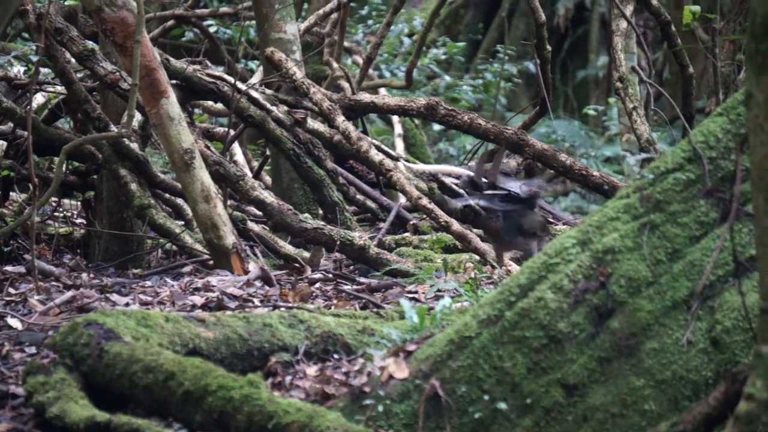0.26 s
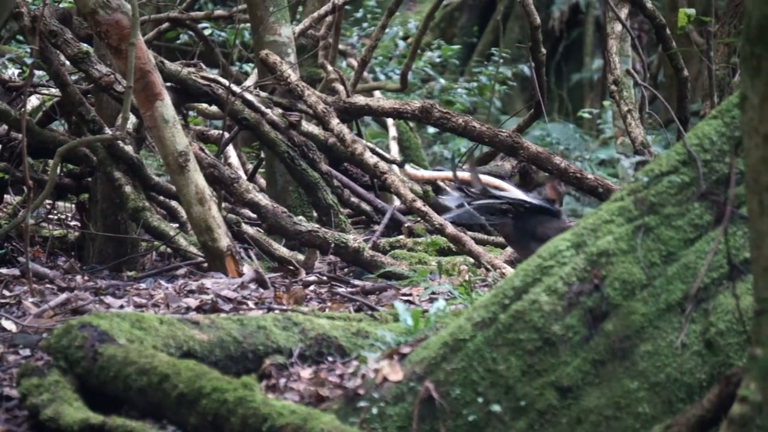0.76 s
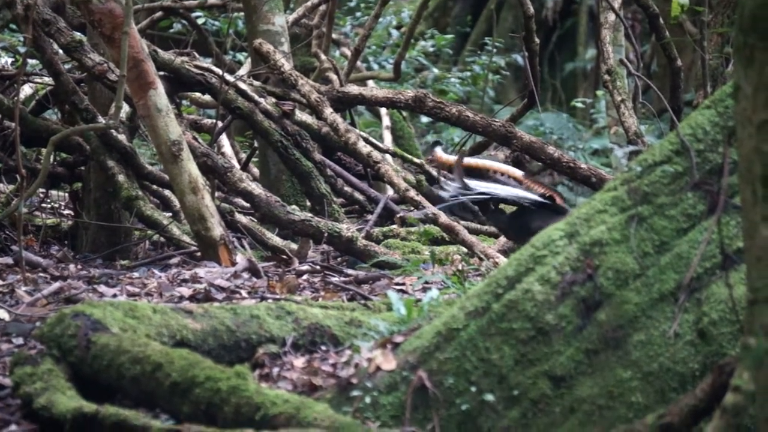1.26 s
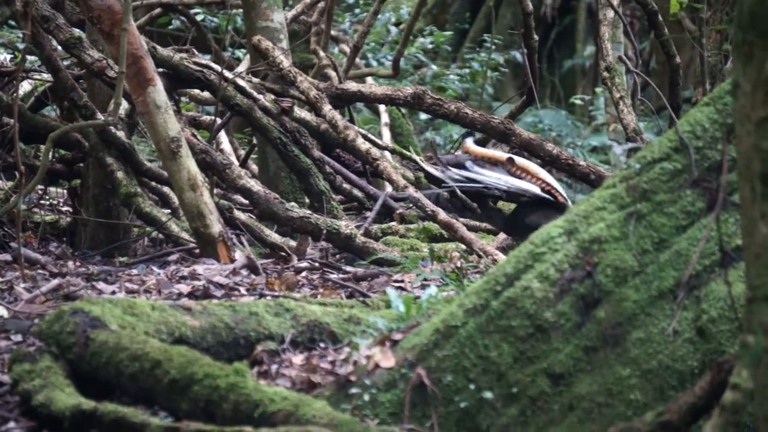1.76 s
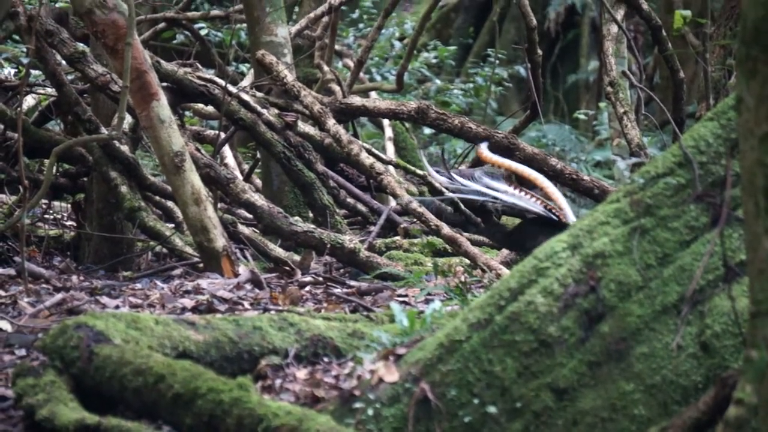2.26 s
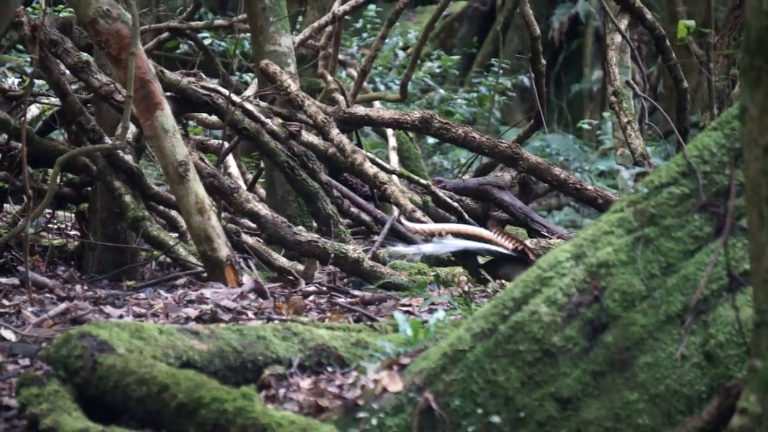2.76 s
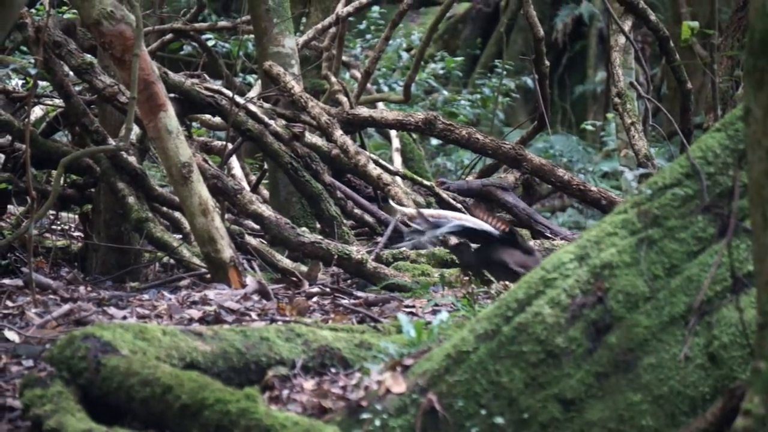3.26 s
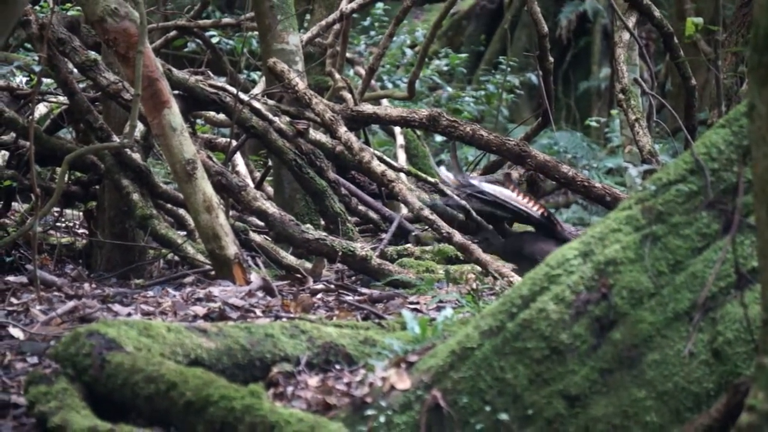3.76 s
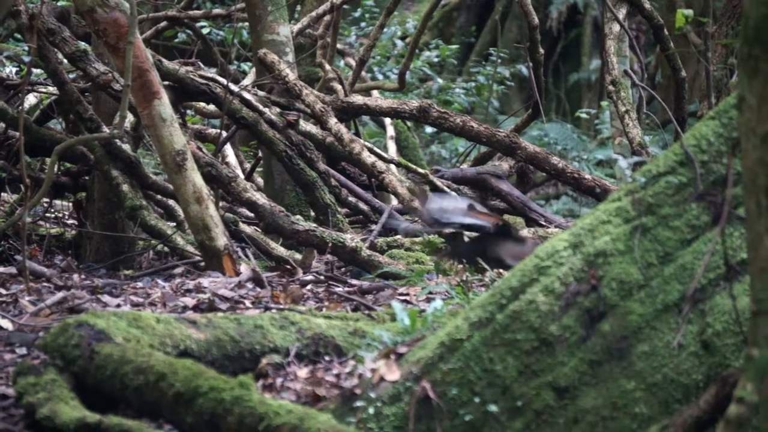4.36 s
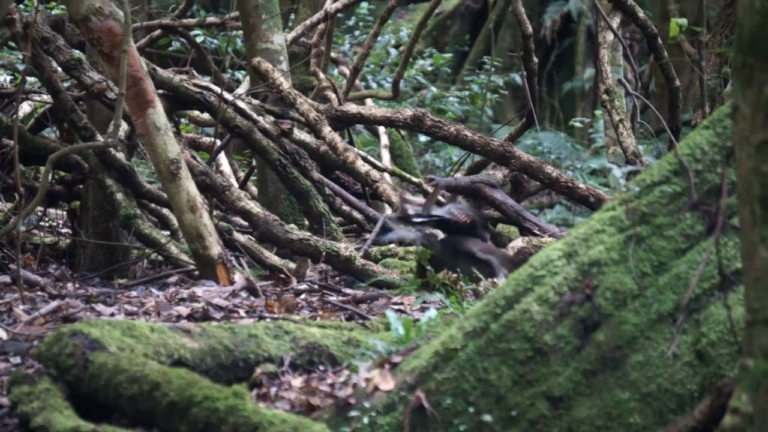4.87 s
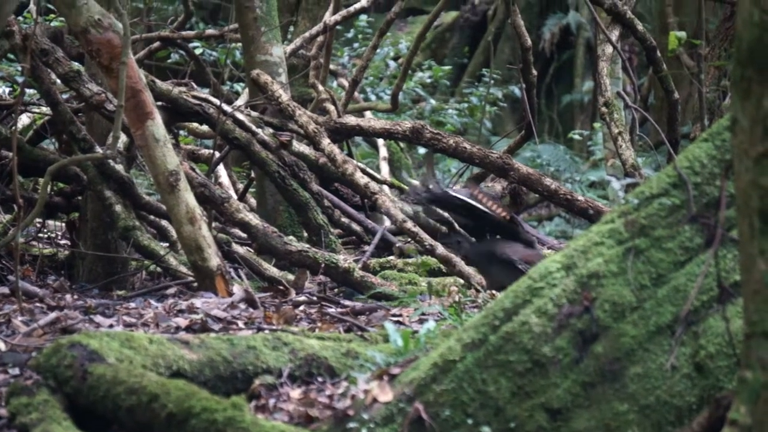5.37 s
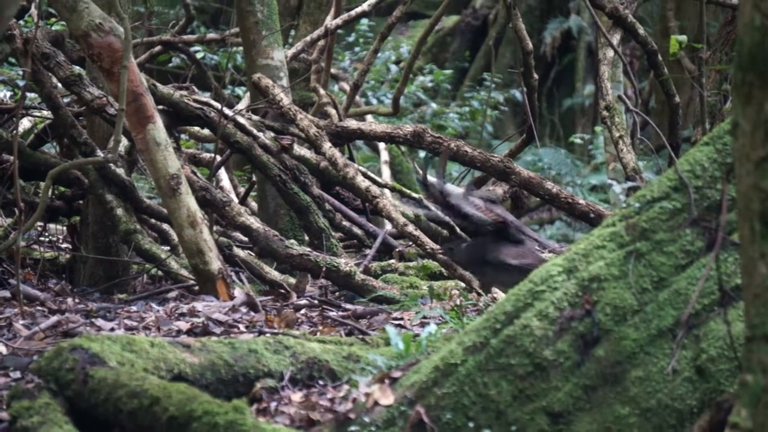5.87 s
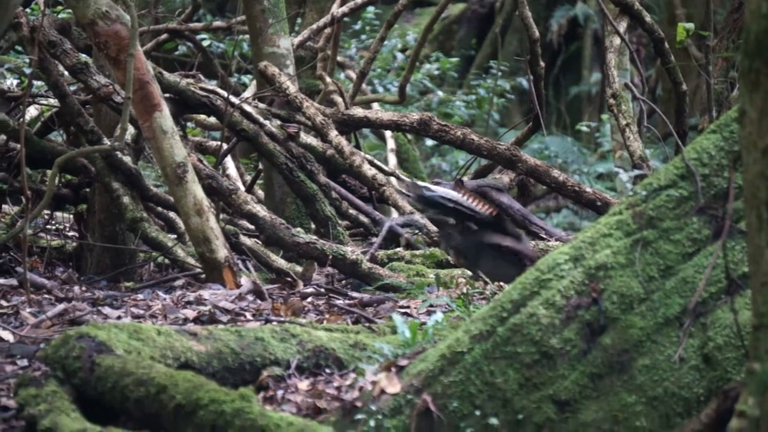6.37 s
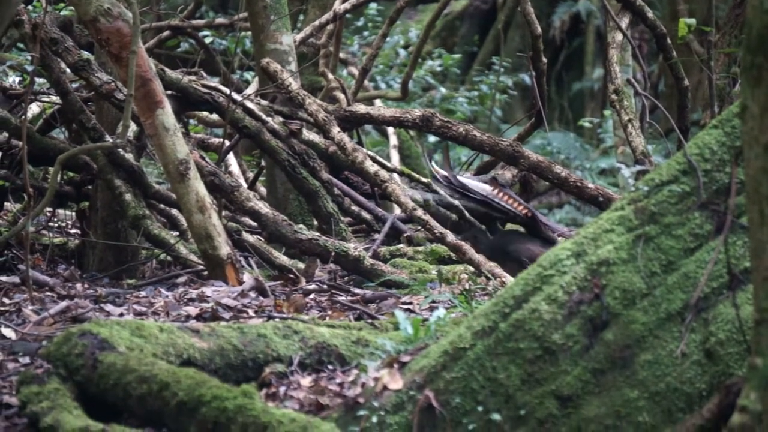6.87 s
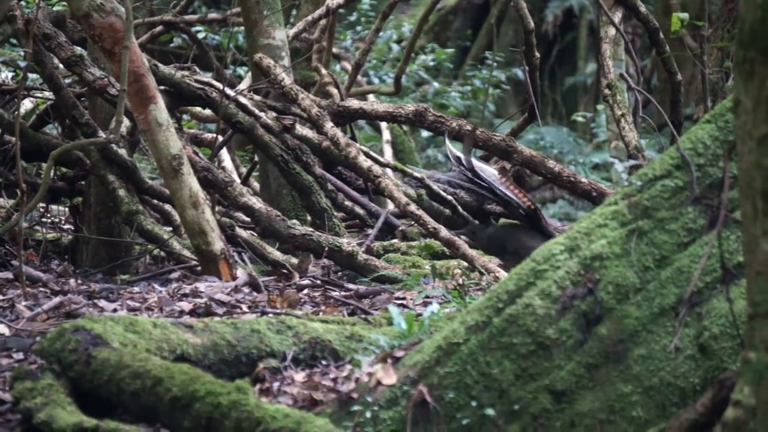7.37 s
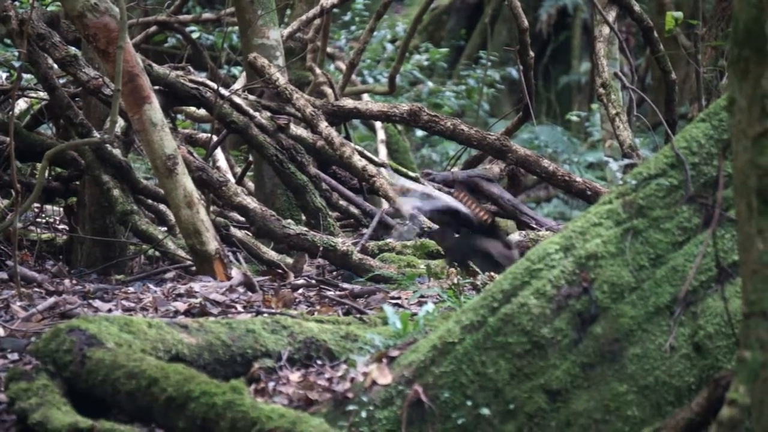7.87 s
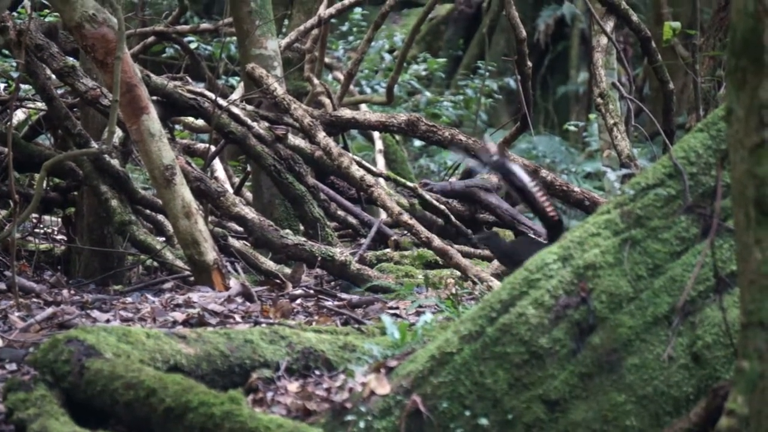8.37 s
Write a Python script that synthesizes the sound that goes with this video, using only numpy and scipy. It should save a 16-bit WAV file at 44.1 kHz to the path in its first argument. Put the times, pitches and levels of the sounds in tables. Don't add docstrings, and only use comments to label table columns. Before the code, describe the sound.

Outdoors in a wood, soft canopy wind and a faint low rumble lie under thin, high, distant bird chirps. From 0 to 1.8 seconds a large bird close by shakes its feathers in a dense, papery, hissing rattle, punctuated by crisp bill snaps at about 0.13, 0.37, 0.6, 1.0 and 1.4, with small liquid gurgles between. At 2.05 a soft low whistle tips into a very loud, sharp, throbbing note, a tenth of a second of fast fluttering pulses near two kilohertz, with a diffuse echo off the trunks. Similar notes follow at about 3.7, 5.35 and 7.0. In the gaps come faint bill ticks and slow feather shivers, with a dull cluck and gurgle at 3.3, 5.0 and 6.65. After the last echo, light ticks, a low gurgle near 8.3 and distant chirps remain until 8.6.

```python
import sys
import numpy as np
from scipy import signal
from scipy.fft import rfft, irfft, next_fast_len
from scipy.io import wavfile
from scipy.ndimage import uniform_filter1d, minimum_filter1d

SR = 44100
rng = np.random.default_rng(int(sys.argv[2]) if len(sys.argv) > 2 else 0)


def store_pcm(level_fs):
    pcm = np.round(np.clip(level_fs, -1, 1) * 32767).astype(np.int16)
    wavfile.write(sys.argv[1], SR, np.atleast_2d(pcm).T)


def magnitude_from_level(level_db):
    exponent = np.asarray(level_db, float) / 20
    return 10 ** exponent


N = 379701
PADDED = next_fast_len(N)
FREQS = np.maximum(np.fft.rfftfreq(PADDED, 1 / SR), 1)
SIDES = np.array([[1], [-1]])

# f/Hz, density/dB per Hz
CANOPY = [(18, -70), (30, -10), (241, -7.5), (531, -14.5), (752, -10.5), (1090, -4), (1270, -5.5),
          (1400, -6), (2180, -8.5), (2530, -13.5), (4160, -20.5), (7530, -25.5), (11200, -32), (14600, -77),
          (22000, -120)]
# f/Hz, side minus mid/dB
SIDE_SHARE = [(60, -20), (170, -22), (490, -9), (1410, -7.5), (4030, -6), (11500, -10.5)]
# t/s, level/dB
HUSH = [(0, -61), (.9, -56.5), (1.87, -57.5), (2.3, -66), (3.5, -57), (3.95, -64.5), (4.3, -56.5),
        (4.84, -61.5), (5.5, -60), (6.02, -51), (6.45, -56.5), (7, -62), (8.61, -63)]
# t/s, level/dB
RUMBLE = [(0, -58), (.89, -54), (1.87, -64.5), (2.5, -68), (3.2, -65.5), (6, -65), (7.5, -62.5),
          (8.61, -60)]
# t/s, level/dB
RATTLE_BASE = [
    (0, -72),
    (.14, -45),
    (.8, -42),
    (1.5, -44.5),
    (1.9, -49),
    (3.6, -62),
    (8.61, -89),
]
# f/Hz, width/Hz, level/dB
QUILLS = [(1335, 120, 4), (1890, 740, 3.5), (3050, 620, -2.5), (4410, 1370, 0), (5830, 120, -3.5),
          (6900, 810, -4), (8820, 900, -13.5), (10470, 610, -23)]
# t/s, level/dB, brightness/dB
SHAKES = [
    (.27, -54, -20),
    (.5, -49, -19),
    (.75, -44.5, 0),
    (.88, -45.5, -28),
    (1.136, -46, 5),
    (1.51, -47.5, 6.5),
    (1.7, -56, -6),
]
# t/s, level/dB, brightness/dB
SHIVERS = [(2.72, -53, 5.5), (3.16, -49, 2), (3.3, -51, 2), (4.38, -59.5, 14), (4.83, -53, 0),
           (4.93, -51, 2.5), (6.04, -55, 7), (6.5, -53.5, 6.5), (6.62, -56.5, 11), (7.65, -59, 10.5),
           (8.1, -62.5, 13.5), (8.25, -62, 9)]
# t/s, level/dB
CHIRPS = [(.045, -52), (0.532, -54), (1.719, -60), (1.95, -55), (2.4, -57), (2.65, -57), (2.932, -59),
          (3.201, -53), (3.43, -60), (3.648, -53), (3.974, -61), (4.158, -57.5), (4.38, -55),
          (4.632, -58.5), (4.867, -56), (5.707, -59), (6.19, -60), (6.39, -55), (6.656, -55.5),
          (6.842, -57.5), (7.565, -57), (7.838, -57.5), (8.359, -58)]
# t/s, length/s, f/Hz, level/dB, roughness/0-1
WHISTLES = [(.264, 0.16, 6860, -49, 0.4), (1.734, 0.14, 576, -52.5, 0.01), (1.747, 0.13, 780, -52.5, 0.06),
            (2.989, .11, 5440, -55, 0.8), (3.186, 0.12, 3900, -53, 0.07), (3.33, 0.14, 3890, -51, 0.11),
            (3.5, .12, 3870, -62, .2), (4.182, 0.035, 6900, -55, 0.3), (4.32, 0.098, 3760, -56, 0.25),
            (4.982, 0.036, 8000, -54, 0.5), (5.067, 0.28, 7540, -64.5, 0.1),
            (8.11, 0.17, 6650, -60.5, 1.17), (8.406, 0.14, 5850, -51, 0.8)]
# f/Hz, early t60/s, late t60/s, strength/dB
FOREST = [(600, 0.39, 4.3, 5.5), (1110, 0.19, 1.6, 9), (1885, 0.58, 0.66, 4.5), (2330, 0.49, 3.18, 5.5),
          (2620, 0.74, 1.37, 6), (3770, 0.72, 1.18, 3.5), (8000, 0.51, 1.23, 9), (10900, 0.46, 0.66, 11)]
# multiple/1, level in notes/dB, level in soft sounds/dB
OVERTONES = [(1, 0, 0), (2, -22.5, -28), (3, -45, -28), (4, -38, -44), (5, -40, -50), (7, -70, -39)]
# f/Hz, density/dB per Hz
RASP = [(1590, -64), (2700, -4.5), (3000, -9), (3600, 0), (4250, -3.5), (5530, -17), (6080, -28),
        (6600, -9.5), (7510, -20.5), (8440, -11), (9390, -21.5), (10300, -14.5), (11000, -18), (14300, -54),
        (22000, -120)]
# t of top/s, peak/dB, f/Hz, half width/ms
GURGLES = [
    (.091, -38, 2070, 10),
    (.271, -36.5, 1850, 6.3),
    (.513, -43, 1860, 6.4),
    (1.118, -51, 2200, 12),
    (1.497, -44, 2050, 15),
    (1.74, -56, 1960, 4),
    (8.27, -42, 1390, 8),
    (3.32, -32.5, 2100, 2.57),
    (4.9835, -28.5, 1900, 2.35),
    (6.66, -29.5, 1880, 2.59),
]
# f/Hz, level/dB, t60/s, ring/0 low 1 middle 2 high
BILL = [(1860, 6, 0.024, 0), (2200, 6, 0.0046, 0), (3010, -4.5, 0.0055, 1), (4270, -8.5, 0.016, 1),
        (4430, -7, 0.011, 1), (6580, 2.5, 0.0085, 2), (8500, -34, 0.0033, 2), (9900, -12, 0.0057, 2)]
# t/s, peak/dB
SNAPS = [
    (.1345, -26.5),
    (.3739, -28.5),
    (0.6112, -25.5),
    (1.0029, -26.5),
    (1.373, -27),
]
# low, middle, high ring/dB
SNAP_RINGS = (-1.5, 3.5, -32)
# t/s, peak/dB
CLUCKS = [
    (3.3172, -40),
    (4.9808, -37),
    (6.6582, -41),
]
# t/s, peak/dB, brightness/dB
TICKS = [(2.709, -47.5, 11), (3.152, -43, 6.5), (4.373, -50, 13.5), (4.48, -44.5, -3), (4.817, -43.5, 2),
         (4.9325, -47, 3), (4.963, -53, 3), (6.0326, -45, 4), (6.137, -43, -10), (6.4911, -44.5, 6),
         (6.6047, -46, 3), (7.644, -42.5, -5), (7.7504, -50, .3), (8.09, -38.5, 0.5), (8.1997, -55, 15)]
# t of top/s, peak/dB, f/Hz, half width/ms
LEADS = [
    (2.0325, -23, 1251, 13.3),
    (2.051, -24, 1256, 13),
    (3.6785, -23.5, 1185, 15.6),
    (3.6955, -28.5, 1210, 8.8),
    (5.333, -23, 1237, 18),
    (6.9755, -23, 1194, 16.7),
    (6.9923, -26.5, 1195, 10.4),
]
# t of top/s, peak/dB, f/Hz, half width/ms
LINGER = [
    (2.085, -34.5, 1235, 20),
    (3.728, -30, 1171, 24),
    (5.357, -29.5, 1261, 13),
    (7.023, -49, 1140, 14),
]
# t of first throb/s, peak/dB, f/Hz, throb gap/ms, growth per throb/dB
BURSTS = [(2.0608, -6, 1948, 4.6, -1), (2.0950, -4.5, 2067, 5.0, -2.3), (2.1190, -6.5, 2010, 5.5, -1),
          (2.1458, -10, 2096, 4.6, -0.3), (3.7078, -10, 2148, 5.5, 2), (3.7395, -8.5, 2058, 6.0, 0),
          (3.7667, -11, 2093, 5.5, 0.7), (3.7913, -10, 2030, 6.6, 1.1), (5.3592, -7, 2053, 5.4, -.6),
          (5.3884, -8.5, 2001, 5.7, .1), (5.4174, -9, 2002, 5.5, 0.1), (5.441, -10.5, 1974, 6.4, -2.5),
          (7.0042, -4, 2028, 5.4, -2.5), (7.0354, -4.5, 2042, 6.5, -1.3), (7.0646, -9.5, 1970, 6.2, -0.6),
          (7.0894, -15, 1973, 5.2, 1.5), (7.105, -15, 2067, 9.4, -3)]
# level/dB, half width/ms
BURST_SHAPE = [
    (0.5, 3.3),
    (-.6, 3.0),
    (-0.8, 3.2),
    (-6.5, 2.166),
]


def rms_one(x):
    return x / np.sqrt(np.mean(x ** 2) + 1e-20)


def in_time(rows):
    s, *columns = np.transpose(rows)
    return [np.interp(np.arange(N) / SR, s, c) for c in columns]


def at_hz(points, hz, index=1):
    points = np.array(points)
    return np.interp(np.log(hz), np.log(points[:, 0]), points[:, index])


def add(track, start_s, piece):
    i = round(start_s * SR)
    track[i:i + len(piece)] += piece[:N - i]


def coloured(x, gain):
    return irfft(rfft(x, PADDED) * gain, PADDED)[..., :N]


def spread(mid, side):
    side = coloured(side, magnitude_from_level(at_hz(SIDE_SHARE, FREQS)))
    return np.array([mid + side, mid - side])


def wind():
    noise = coloured(spread(*rng.standard_normal((2, N))), magnitude_from_level(at_hz(CANOPY, FREQS)))
    rumble = coloured(noise, 1 / (1 + (FREQS / 320) ** 6))
    leaves = coloured(noise, 1 / (1 + (800 / FREQS) ** 6))
    hush = noise - rumble - leaves
    hum = coloured(spread(*rng.standard_normal((2, N))), 1 / (1 + ((FREQS - 115) / 25) ** 2))
    (rumble_db,), (hush_db,) = in_time(RUMBLE), in_time(HUSH)
    hum_db = -70 + 5 * np.interp(np.arange(N), np.linspace(0, N, num=30), rng.standard_normal(30))
    leaves_db = -50.5 + 0.089 * (rumble_db - rumble_db.mean())
    rumble = coloured(rumble, 1 / (1 + (160 / FREQS) ** 4))
    low = magnitude_from_level(rumble_db) * rms_one(rumble) + magnitude_from_level(hum_db) * rms_one(hum)
    return low + magnitude_from_level(hush_db) * rms_one(hush) + magnitude_from_level(leaves_db) * rms_one(leaves)


def feather_moves():
    jolts = [(s, 0.0063, 0.11, peak_db - 21, 5) for s, peak_db in SNAPS]
    shakes = [(s, 0.018, 0.11, *rest) for s, *rest in SHAKES]
    shivers = [(s, 0.084, 0.12, *rest) for s, *rest in SHIVERS]
    return jolts + shakes + shivers


def rattle(uneven_db=0.5, ticks_per_s=4000, bright_above_hz=2600):
    t = np.arange(SR) / SR
    sizes = magnitude_from_level(0.37 * np.minimum(rng.exponential(1, (2, N)), 5)) * rng.choice([-1, 1], (2, N))
    clumps = magnitude_from_level(1.8 * rms_one(uniform_filter1d(rng.standard_normal(N), size=700)))
    mid, side = sizes * (rng.random((2, N)) < ticks_per_s * clumps / SR)
    ticks = rfft(rms_one(spread(mid, side * magnitude_from_level(-2.5))), PADDED)
    moves, base = feather_moves(), magnitude_from_level(in_time(RATTLE_BASE)[0] - 5.5)
    favour, out = rng.standard_normal((len(moves), len(QUILLS))), 0
    for k, (hz, width_hz, mode_db) in enumerate(QUILLS):
        bright = hz > bright_above_hz
        effort = base * bright
        for (s, rise_s, fall_s, level_db, bright_db), luck in zip(moves, favour[:, k]):
            peak_db = level_db + 4.5 + bright_db * bright + uneven_db * luck
            add(effort, s, magnitude_from_level(peak_db) * (1 - np.exp(-t / rise_s)) * np.exp(-t / fall_s))
        body = magnitude_from_level(mode_db + 5) / np.sqrt(1 + (2 * (FREQS - hz) / width_hz) ** 4)
        out = out + effort * irfft(ticks * body, PADDED)[:, :N]
    return out


def far_birds():
    out = np.zeros(N)
    calls = [(s, .047, 6550, 7900, level_db, 0.39) for s, level_db in CHIRPS]
    calls += [(s, length_s, hz, hz * (1 - 0.019), level_db, rough)
              for s, length_s, hz, level_db, rough in WHISTLES]
    for s, length_s, start_hz, end_hz, level_db, rough in calls:
        u = np.linspace(0, 1, round(length_s * SR))
        wobble = rms_one(uniform_filter1d(rng.standard_normal(len(u)), 60))
        hz = start_hz + (end_hz - start_hz) * np.sin(np.pi * u / 2) + 450 * rough * wobble
        swell = magnitude_from_level(level_db) * np.minimum(8 * u, 1) * np.sqrt(1 - u ** 2)
        add(out, s, swell * np.sin(2 * np.pi * np.cumsum(hz) / SR))
    return out


def forest(x, wet_db, late_db=-16, side_db=-7):
    t = np.arange(2 * SR) / SR
    white, echo = rng.standard_normal((2, 2, len(t))), 0
    for k, low_hz in enumerate(450 * 2 ** np.arange(0, 4.7, 1 / 3)):
        third = signal.butter(2, [low_hz, low_hz * 2 ** (1 / 3)], "band", fs=SR, output="sos")
        early_s, late_s, strength_db = [at_hz(FOREST, low_hz * 1.12, index=i) for i in (1, 2, 3)]
        band = signal.sosfilt(third, white[k % 2]) * magnitude_from_level(strength_db)
        echo = echo + band * np.hypot(magnitude_from_level(-60 * t / early_s), magnitude_from_level(late_db - 60 * t / late_s))
    onset = (1 - np.exp(-(t / .005) ** 2)) * (1 - .72 * np.exp(-(t / .06) ** 2))
    mid, side = echo * onset * magnitude_from_level(wet_db)
    echo = mid + SIDES * magnitude_from_level(side_db) * side
    return signal.fftconvolve(x[None], echo, axes=1)[:, :N]


def voice(rows, column, glide, breath_db):
    out, air = np.zeros(N), np.zeros(N)
    for s, peak_db, hz, width_ms in rows:
        start_s = s - width_ms / 1000
        u = np.linspace(-1, 1, round(2 * width_ms * SR / 1000))
        phase = 2 * np.pi * np.cumsum(hz * (1 - glide * u)) / SR
        swell = magnitude_from_level(peak_db) * np.cos(np.pi * u / 2) ** 2
        tone = sum(magnitude_from_level(row[column]) * np.sin(row[0] * phase) for row in OVERTONES)
        add(out, start_s, swell * tone)
        add(air, start_s, swell)
    rasp = rms_one(coloured(rng.standard_normal(N), magnitude_from_level(at_hz(RASP, FREQS))))
    return out + magnitude_from_level(breath_db) * air * rasp


def bill_contacts():
    snaps = [(*row, *SNAP_RINGS) for row in SNAPS]
    clucks = [(*row, .1, -14, -4) for row in CLUCKS]
    ticks = [(s, peak_db, .1, 3.1, .1 + bright_db) for s, peak_db, bright_db in TICKS]
    return snaps + clucks + ticks


def bill():
    out, rows = np.zeros(N), bill_contacts()
    crunch = np.exp(-np.arange(SR // 300) / (0.0013 * SR))
    chance = rng.standard_normal((len(rows), len(BILL), len(crunch)))
    chance[:, :, 0] = 4
    for k, (hz, level_db, t60_s, ring) in enumerate(BILL):
        hits = np.full(N, 1e-18)
        for i, (s, peak_db, *rings_db) in enumerate(rows):
            hit_db = peak_db + rings_db[round(ring)] + level_db - 16.5
            add(hits, s, magnitude_from_level(hit_db) * crunch * chance[i, k])
        r, w = magnitude_from_level(-60 / (t60_s * SR)), 2 * np.pi * hz / SR
        out += signal.lfilter([.5, 0, -.5], [1, -2 * r * np.cos(w), r * r], hits)
    return out


def throbs(scatter_db=1.1, scatter_hz=45, width_scatter=.18, sag_hz=27.8):
    chance = rng.standard_normal((len(BURSTS), len(BURST_SHAPE), 3))
    rows = []
    for (s, peak_db, hz, gap_ms, growth_db), burst_luck in zip(BURSTS, chance):
        for k, (step_db, width_ms) in enumerate(BURST_SHAPE):
            luck = burst_luck[k]
            rows.append((s + k * gap_ms / 1000,
                         peak_db + step_db + k * growth_db + scatter_db * luck[0],
                         hz - sag_hz * (k - 1) + scatter_hz * luck[1],
                         width_ms * np.exp(width_scatter * luck[2])))
    return rows


def scene():
    notes = magnitude_from_level(-0.5) * voice(throbs(), column=1, glide=0.085, breath_db=-26.0)
    soft = voice([*LEADS, *LINGER], column=2, glide=0.06, breath_db=-35)
    soft = soft + voice(GURGLES, column=2, glide=0.065, breath_db=-18.5)
    clicks = signal.sosfilt(signal.butter(2, 1400, "high", fs=SR, output="sos"), bill())
    far = far_birds()
    to_trees = notes + magnitude_from_level(-5.0) * soft + magnitude_from_level(-9) * clicks + magnitude_from_level(-2.5) * far
    bird = notes + soft + clicks + forest(to_trees, wet_db=-32.5)
    throat = coloured(bird, 1 / (1 + ((FREQS - 2400) / 400) ** 4))
    bird = throat * magnitude_from_level(-1.4 * SIDES) + (bird - throat) * magnitude_from_level(-.1 * SIDES)
    return bird + far + rattle() + wind()


def levelled(x, knee_db=-24.5, share=0.17, attack_s=0.051, recovery_db_per_s=54):
    creep_db = recovery_db_per_s * np.arange(N) / SR
    level_db = 10 * np.log10(uniform_filter1d((x ** 2).mean(axis=0), size=400).clip(1e-12))
    held_db = np.maximum.accumulate(level_db + creep_db) - creep_db
    r = np.exp(-1 / (attack_s * SR))
    return x * magnitude_from_level(signal.lfilter([1 - r], [1, -r], -share * np.maximum(held_db - knee_db, 0)))


def roll_off(x):
    return signal.sosfilt(signal.butter(12, 12120, fs=SR, output="sos"), x)


def record(dry):
    even = levelled(dry)
    bent = even + 0.0058 * even ** 2
    height = -minimum_filter1d(-np.abs(bent).max(axis=0), size=60)
    held = bent * uniform_filter1d(np.minimum(1, .5 / (height + 1e-9)) ** .7, size=60)
    cut = signal.sosfilt(signal.butter(2, 60, "high", fs=SR, output="sos"), held)
    cut = signal.sosfilt(signal.ellip(7, .5, 38, 11020, fs=SR, output="sos"), cut)
    return roll_off(cut)


dry = scene()
out = record(dry)
store_pcm(out)
```